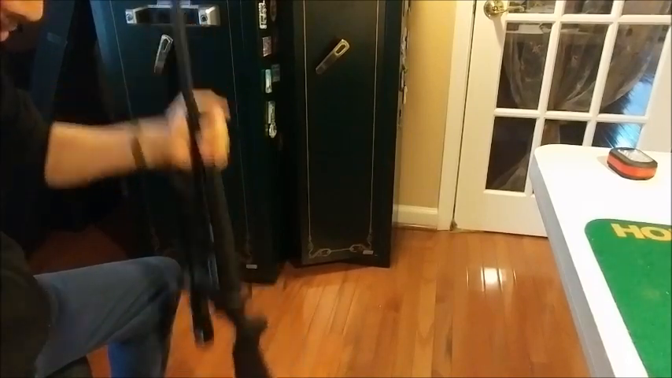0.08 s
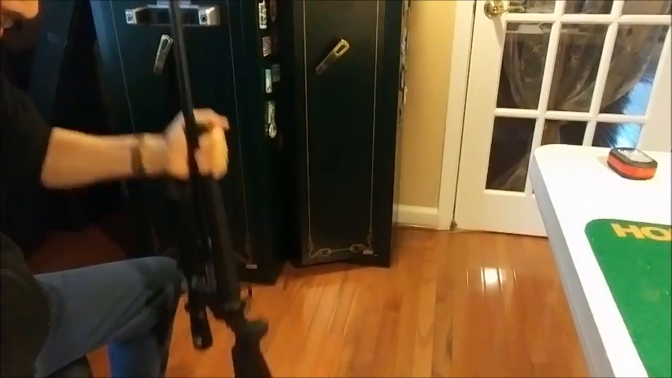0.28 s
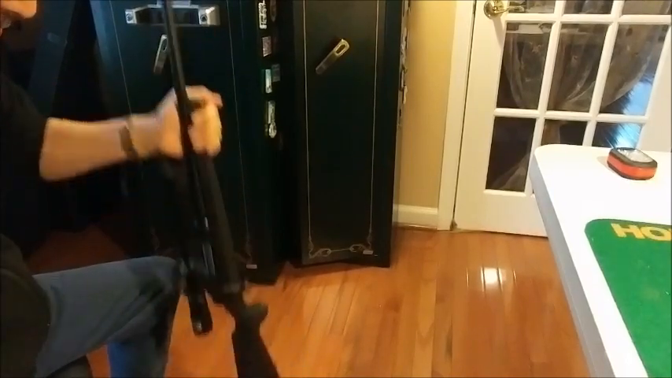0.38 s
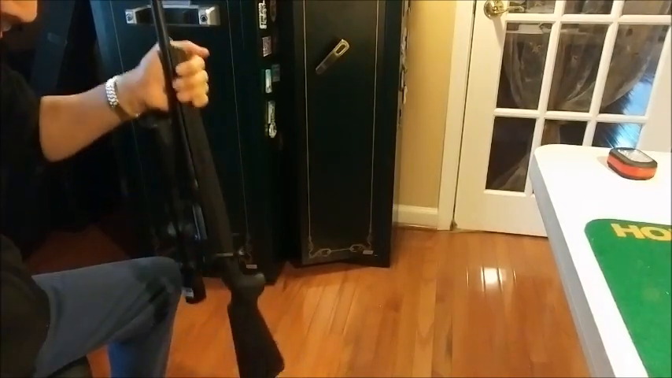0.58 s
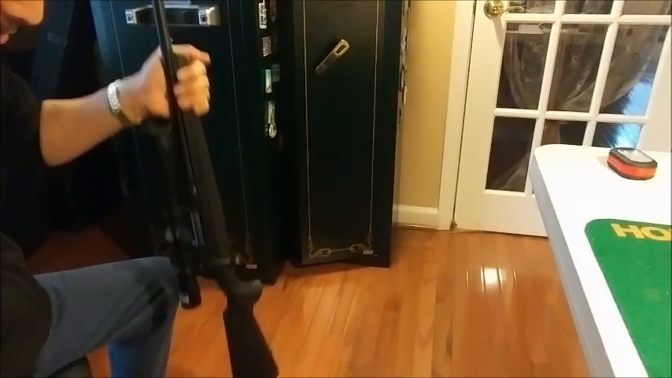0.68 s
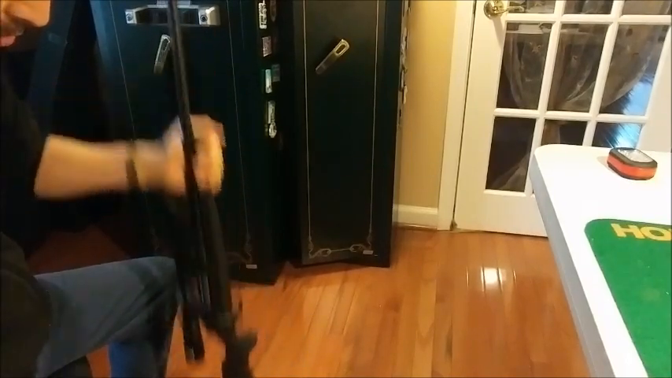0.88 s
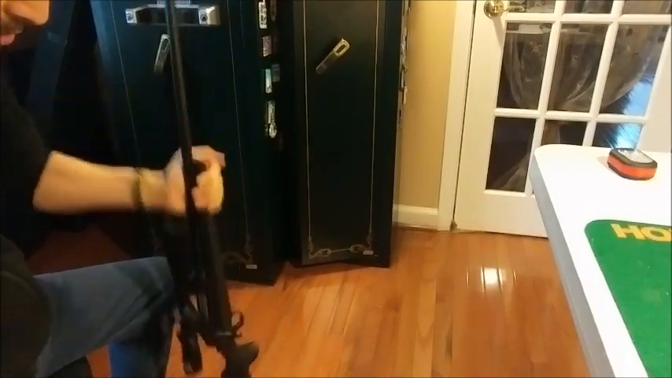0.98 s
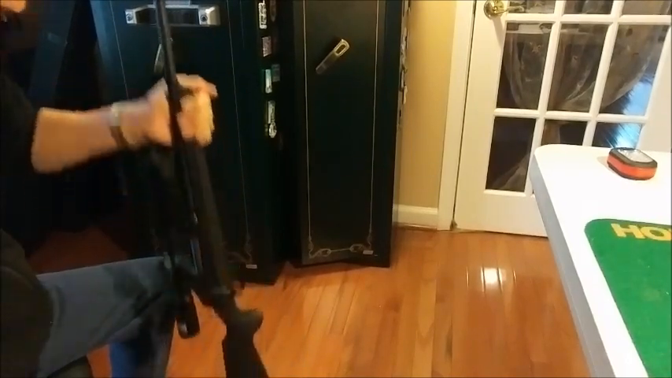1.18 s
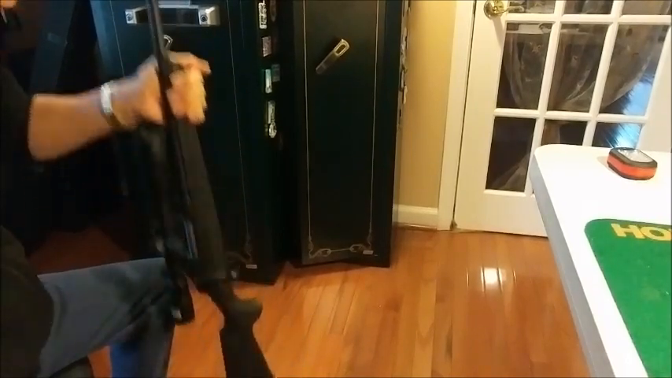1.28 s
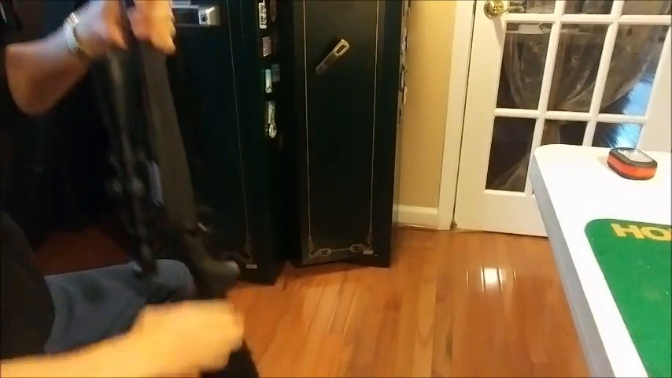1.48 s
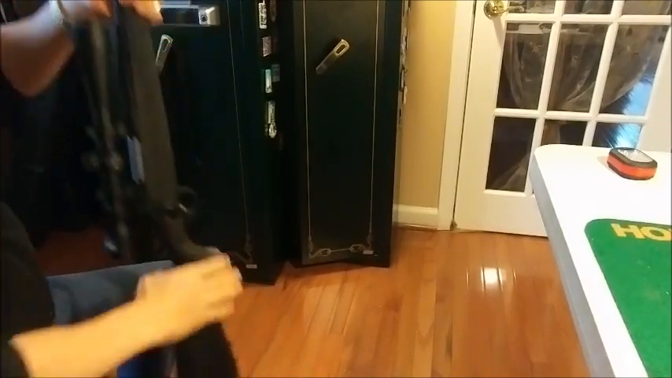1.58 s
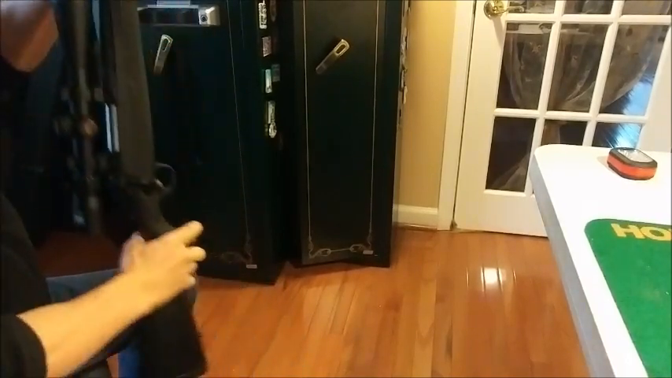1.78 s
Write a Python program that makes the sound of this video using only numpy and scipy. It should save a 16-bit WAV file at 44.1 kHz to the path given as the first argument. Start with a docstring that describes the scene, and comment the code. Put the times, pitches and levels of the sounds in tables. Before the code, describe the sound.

Two heavy, booming thuds of a gun stock on floorboards, with metallic clatter, then faint handling

```python
"""In a small, quiet room, a rifle butt bangs twice on a hardwood floor as the boom of an earlier blow dies away.
Each blow is beating floor modes under a noise boom, plus a dull knock of filtered noise. As the floor bounces,
loose metal, probably the steel cabinets standing on it, clashes in noise bursts and rings in sine modes.
Then the rifle is lifted: noise swells for a hand sliding along the stock and decaying dull noise for soft bumps.
A steady hush of filtered noise lies under it all."""
import sys
import numpy as np
from scipy import signal
from scipy.fft import rfft, irfft, next_fast_len
from scipy.io import wavfile
from scipy.ndimage import uniform_filter1d, minimum_filter1d

SR = 44100
rng = np.random.default_rng(int(sys.argv[2]) if len(sys.argv) > 2 else 0)


def generate_wav(signal):
    """Clip the signal to [-1, 1] and save it as 16-bit WAV at the path in sys.argv[1]."""
    frames = np.transpose(np.atleast_2d(signal))
    scaled = np.clip(frames, -1, 1) * 32767
    pcm = np.round(scaled).astype(np.int16)
    wavfile.write(sys.argv[1], SR, pcm)


N = 79380  # length in samples

# Blows of the butt; the first lies before the start, so only its tail is heard and its metal is silent.
# Columns: start_s, thud_level_db, knock_level_db, rattle_level_db (relative levels)
BLOWS = [(-.56, -2, -2.5, -5), (.207, 1.5, -1.5, 1.5), (.979, 0.5, -1.5, 2)]
# Close pairs of floor and room modes that beat.
# Columns: centre_hz, split_hz, level_db (relative), swell_s, t60_s
FLOOR_MODES = [(56.98, 7.3, -10, .026, .5), (52.64, 1.9, -21.5, .03, 0.76), (67.1, 4.9, -15.5, 0.069, 0.51),
               (112.4, 12, -20.5, 0.0041, 0.42), (164.1, 5.2, -18.5, .02, 0.32),
               (181.3, 12, -27.5, .015, .45)]
# Ringing modes of the rattling steel. Columns: pitch_hz, level_db (relative), t60_s
STEEL_MODES = [(994.3, -25.5, .33), (1049.5, -25, 0.19), (1086, -29.5, 0.22), (1181, -42, 0.29),
               (1492, -41, 0.09), (1628, -34, .26), (1640, -34, .24), (1912, -36, .25), (2052, -35.5, .32),
               (2452, -39, .25), (3110, -32, .25), (4330, -42.5, 0.08), (7550, -36, 0.083),
               (8240, -42, .17)]

# Spectra of the noise layers, each rescaled to rms 1 after filtering. Columns: frequency_hz, level_db (relative)
# Low boom of the floor and room
BOOM_COLOUR = [(30, -19.5), (48, -1.5), (120, 1), (170, -3), (250, -7), (400, -12), (700, -19), (1500, -49)]
# Wooden knock of the butt on the boards
KNOCK_COLOUR = [(80, -9.5), (250, -5), (420, -6), (520, 1), (585, 8), (660, 0.5), (800, -2.5),
                (1500, -10.5), (3000, -20.5), (5000, -31), (9000, -32), (16000, -51)]
# Clash of loose steel
CLASH_COLOUR = [(100, -24), (300, -9.5), (750, -6), (1000, 1.5), (1280, -0.5), (1700, 2.5), (2700, 0),
                (3800, -2), (5400, -2.5), (6600, -2.5), (7900, 2.5), (9000, -10), (12000, -11.5),
                (15000, -9.5)]
# Hand sliding on the stock
SLIDE_COLOUR = [(500, -10), (2000, -15), (4000, -11.5), (6000, -7.5), (8000, -2.5), (9200, -13),
                (15000, -16)]
# Soft handling bumps
BUMP_COLOUR = [(40, -11), (110, 4), (200, 6.5), (400, -15.5), (800, -19), (2500, -34)]
# Hush of the room
HUSH_COLOUR = [(15, -41), (25, -17.5), (37, -3), (77, -5.5), (191, -6), (286, -11.5), (363, -9.5),
               (1150, -22.5), (1240, -26.5), (1350, -23), (15000, -41)]

# Frequency response of the recorder. Columns: frequency_hz, gain_db
MICROPHONE_RESPONSE = [(20, 5.5), (8300, 0.5), (9150, -1.5), (9800, -44.5), (11100, -44), (11900, -9.5),
                       (15500, -14.5)]
# Slides of the hand along the stock. Columns: peak_s, rise_s, fall_s, level_db (before panning)
SLIDES = [(1.355, 0.076, 0.063, -52), (1.76, 0.032, 0.038, -69.5)]
# Soft bumps of handling. Columns: start_s, level_db (before panning), t60_s
BUMPS = [(1.473, -62, 0.69), (1.526, -71, .45), (1.575, -67.5, 0.39), (1.654, -62.5, 0.45)]
# Loose parts that land one after the other on each bounce. Columns: lag_s, level_db (relative)
PARTS = [(0, -2), (.0013, -3.5), (.007, -3.5)]

# Levels in dB are relative to the other layers; each t60 is the time to fall by 60 dB
ROOM_T60_S = 0.56
BOOM_DB, BOOM_SWELL_S, BOOM_T60_S = -20, 0.031, 0.57
KNOCK_DB, KNOCK_RISE_S, KNOCK_T60_S, KNOCK_ROOM_DB = -25, 0.0021, 0.29, -9.5
HUSH_DB = -66.5
BOUNCE_S, BOUNCE_JITTER_S, FIRST_CLASH_S = 0.0166, 0.0004, 0.002
RATTLE_PEAK_S, RATTLE_RISE_DB_PER_S, RATTLE_FALL_S, RATTLE_SCATTER_DB = 0.033, 491.5, 0.053, 1.04
CLASH_DB, CLASH_T60_S, CLASH_ROOM_DB = -20.5, 0.34, -10
CRACK_DB, CRACK_T60_S = -0.5, 0.012
TREBLE_HZ, TREBLE_T60_SHARE = 5000, 0.58  # above this crossover the clash's decay times shrink to this share
RING_ROUGH, WANDER_HZ = 0.67, 45
THUD_PAN_DB, KNOCK_PAN_DB, RATTLE_PAN_DB = 5.5, 3, 5  # left over right
HISS_DB, TOP_HZ = -77.5, 15500
PEAK_LIMIT, LIMIT_S = 0.97, 0.002


def undb(db):
    """Decibels to gain."""
    return 10 ** (np.asarray(db) / 20)


def pan(db):
    """Left and right gains for a level difference; positive leans left."""
    return undb(np.array([[db], [-db]]) / 2)


def since(start):
    """Seconds since a moment, zero before it."""
    return np.maximum(np.arange(N) / SR - start, 0)


def fade(t, t60):
    """Exponential decay that falls 60 dB in t60 seconds."""
    return np.exp(-np.log(1000) * t / t60)


def swell(t, rise):
    """Smooth onset from zero to one."""
    return 1 - np.exp(-(t / rise) ** 2)


def colour(x, points):
    """Causal minimum-phase filter through (Hz, dB) points."""
    size = 2 * next_fast_len(N)
    hz, db = np.array(points, float).T
    bins_hz = np.arange(size // 2 + 1) * SR / size
    gain = undb(np.interp(np.log(bins_hz + 1), np.log(hz), db))
    # Folding the cepstrum onto positive time makes the filter causal
    cepstrum = irfft(np.log(gain))
    cepstrum[1:size // 2] *= 2
    cepstrum[size // 2 + 1:] = 0
    response = np.exp(rfft(cepstrum))
    return irfft(rfft(x, size) * response)[..., :N]


def noise(points, likeness):
    """Coloured stereo noise of rms 1; likeness is the share of power common to both channels."""
    share = np.clip(likeness, 0, 1)
    common = np.sqrt(share) * rng.standard_normal(N)
    separate = np.sqrt(1 - share) * rng.standard_normal((2, N))
    x = colour(common + separate, points)
    return x / x.std()


def thud(start):
    """The floor swings up in beating pairs of modes and the room booms after it."""
    t = since(start)
    modes = 0
    for hz, split, db, rise, t60 in FLOOR_MODES:
        beating = np.sin(np.pi * split * t) * np.cos(2 * np.pi * hz * t)
        modes = modes + undb(db) * swell(t, rise) * fade(t, t60) * beating
    boom_shape = swell(t, BOOM_SWELL_S) * fade(t, BOOM_T60_S)
    boom = undb(BOOM_DB) * noise(BOOM_COLOUR, likeness=0.88) * boom_shape
    return (modes + boom) * pan(THUD_PAN_DB)


def knock(start):
    """The padded butt meets the boards: a dull wooden knock and its reverberation."""
    t = since(start)
    decay = fade(t, KNOCK_T60_S) + undb(KNOCK_ROOM_DB) * fade(t, ROOM_T60_S)
    shape = swell(t, KNOCK_RISE_S) * decay
    return undb(KNOCK_DB) * noise(KNOCK_COLOUR, likeness=0.22) * shape * pan(KNOCK_PAN_DB)


def hush():
    """The quiet room holds a steady, mostly low wash of noise."""
    return undb(HUSH_DB) * noise(HUSH_COLOUR, likeness=0.22) * pan(db=2.5)


def bounces(start, count=7):
    """One contact impulse per bounce of the floor, growing quickly and then dying away."""
    chance = rng.standard_normal((count, 2))
    after = FIRST_CLASH_S + BOUNCE_S * np.arange(count)
    past = after - RATTLE_PEAK_S
    growing = undb(RATTLE_RISE_DB_PER_S * past)
    dying = np.exp(-(past / RATTLE_FALL_S) ** 2)
    force = np.where(past < 0, growing, dying)
    times = start + after + BOUNCE_JITTER_S * chance[:, 0]
    sizes = force * undb(RATTLE_SCATTER_DB * chance[:, 1])
    contacts = np.zeros(N)
    for at, size in zip(times, sizes):
        if at >= 0:
            contacts[int(at * SR)] += size
    return contacts


def clash_shape(t):
    """Crack, shaking panels and room tail add in power as they decay."""
    crack = undb(CRACK_DB) * fade(t, CRACK_T60_S)
    panels = fade(t, CLASH_T60_S)
    room = undb(CLASH_ROOM_DB) * fade(t, ROOM_T60_S)
    return np.sqrt(crack ** 2 + panels ** 2 + room ** 2)


def clash():
    """One contact of loose steel is a decaying burst of noise whose treble dies sooner."""
    x = noise(CLASH_COLOUR, likeness=0.05)
    lowpass = signal.butter(2, TREBLE_HZ, fs=SR, output="sos")
    low = signal.sosfiltfilt(lowpass, x)
    treble = x - low
    t = since(0)
    return undb(CLASH_DB) * (low * clash_shape(t) + treble * clash_shape(t / TREBLE_T60_SHARE))


def ring(contacts):
    """The contacts feed energy to the decaying modes of the steel, which waver as they ring."""
    out = 0
    hold = int(SR / WANDER_HZ)  # samples of smoothing for the waver
    for hz, db, t60 in STEEL_MODES:
        # Energy decays twice as fast in dB-exponent as amplitude, hence 2 / SR
        energy = signal.lfilter([1], [1, -fade(2 / SR, t60)], contacts ** 2)
        drift = uniform_filter1d(rng.standard_normal((2, 2, N)), hold)
        drift = uniform_filter1d(drift, hold // 2)
        in_phase, quadrature = RING_ROUGH * np.sqrt(hold) * drift
        phase = 2 * np.pi * hz * since(0) + np.pi * rng.random((2, 1))
        wavering = (1 + in_phase) * np.sin(phase) + quadrature * np.cos(phase)
        out = out + undb(db) * np.sqrt(energy) * wavering
    return out


def rattle():
    """Every loose part clashes with its own sound on each bounce; the first to land sets the steel ringing."""
    contacts = []
    for lag, part_db in PARTS:
        hits = sum(undb(db) * bounces(at + lag) for at, _, _, db in BLOWS)
        contacts.append(undb(part_db) * hits)
    clashes = sum(signal.fftconvolve(part[None], clash(), axes=1)[:, :N] for part in contacts)
    return (clashes + ring(contacts[0])) * pan(RATTLE_PAN_DB)


def hand_slides():
    """A hand rubs along the stock: bright noise that swells and fades."""
    t = since(0)
    shape = 0
    for peak, rise, fall, db in SLIDES:
        width = np.where(t < peak, rise, fall)
        shape = shape + undb(db) * np.exp(-((t - peak) / width) ** 2)
    return shape * noise(SLIDE_COLOUR, likeness=0.076) * pan(db=4)


def soft_bumps():
    """The rifle bumps softly as it is lifted: dull noise with quick onsets and long decays."""
    shape = 0
    for at, db, t60 in BUMPS:
        t = since(at)
        shape = shape + undb(db) * swell(t, 0.0023) * fade(t, t60)  # rise in s
    return shape * noise(BUMP_COLOUR, likeness=0.81) * pan(db=3.5)


def scene():
    """Blows, rattle and handling over the hush of the room."""
    floor = 0
    for at, thud_db, knock_db, _ in BLOWS:
        floor = floor + undb(thud_db) * thud(at) + undb(knock_db) * knock(at)
    return floor + hush() + rattle() + hand_slides() + soft_bumps()


def record(dry):
    """The recorder dips in the high treble, hisses faintly, limits the highest peaks and cuts the top."""
    hiss = undb(HISS_DB) * rng.standard_normal((2, N))
    heard = colour(dry, MICROPHONE_RESPONSE) + hiss
    span = int(LIMIT_S * SR)
    needed = PEAK_LIMIT / np.maximum(abs(heard), PEAK_LIMIT)
    gain = uniform_filter1d(minimum_filter1d(needed, span), span)  # hold each dip, then smooth it
    top_cut = signal.ellip(8, 0.1, 60, TOP_HZ, fs=SR, output="sos")
    return signal.sosfiltfilt(top_cut, heard * gain)


dry = scene()
out = record(dry)
generate_wav(out)
```